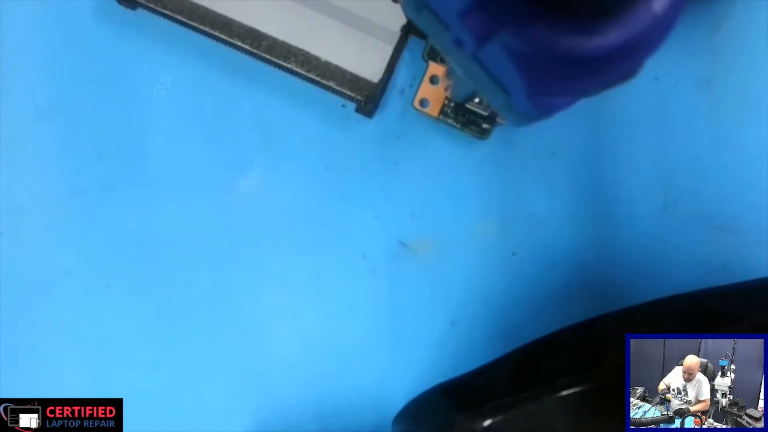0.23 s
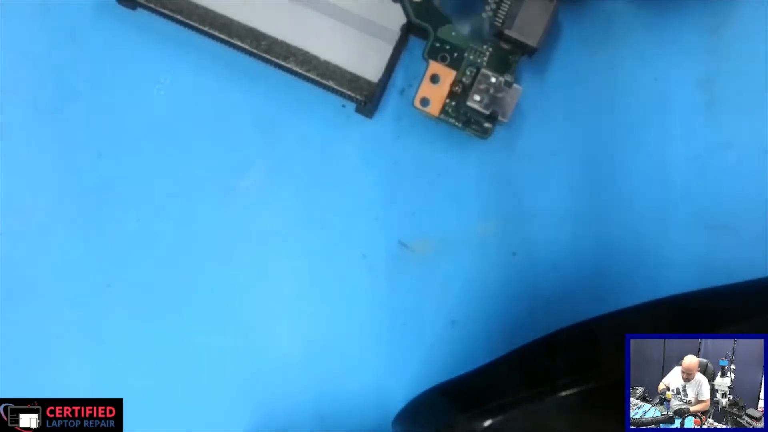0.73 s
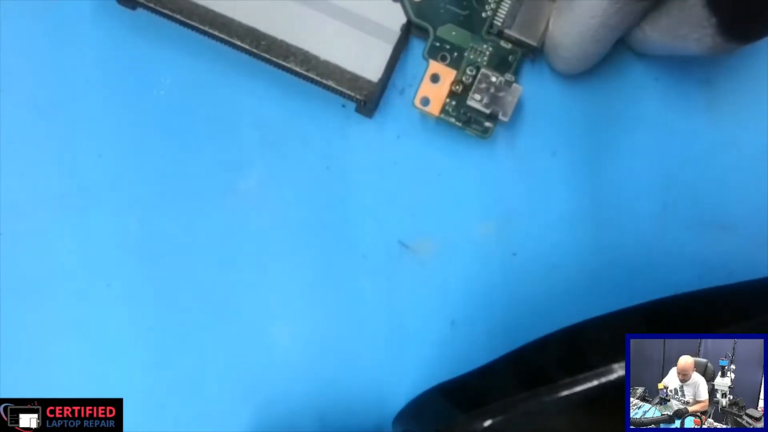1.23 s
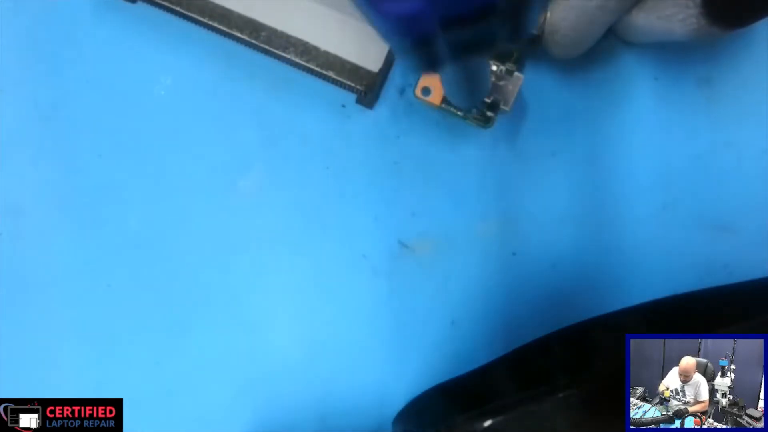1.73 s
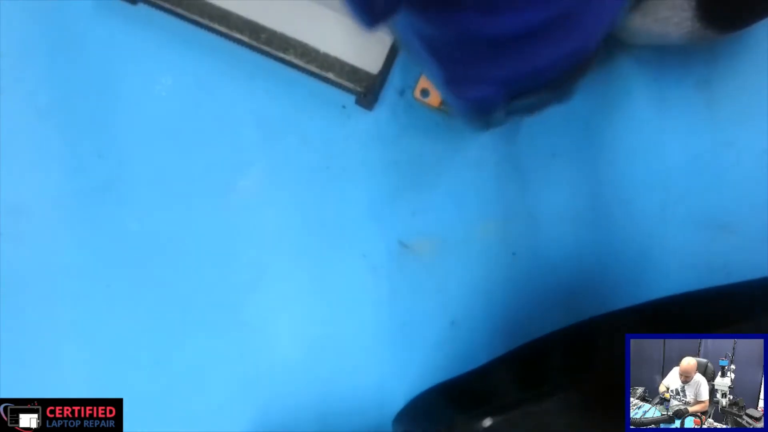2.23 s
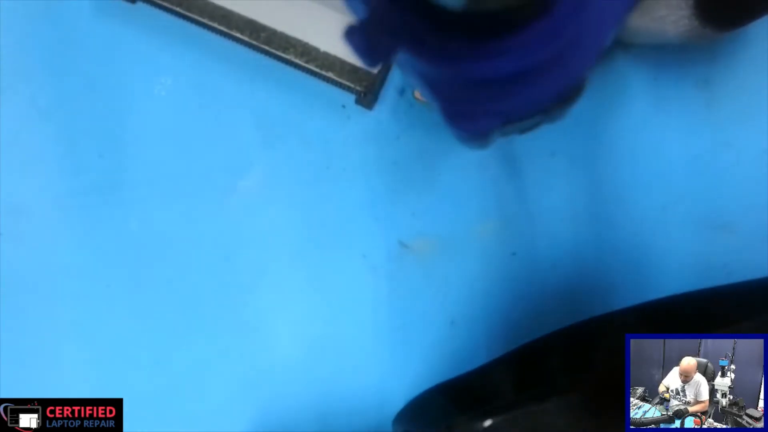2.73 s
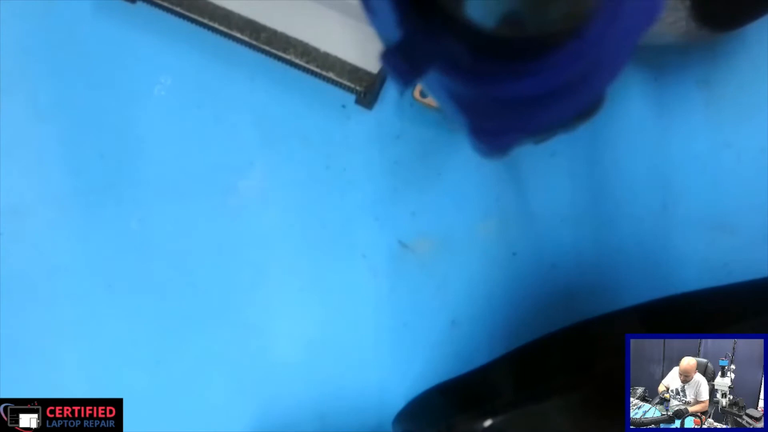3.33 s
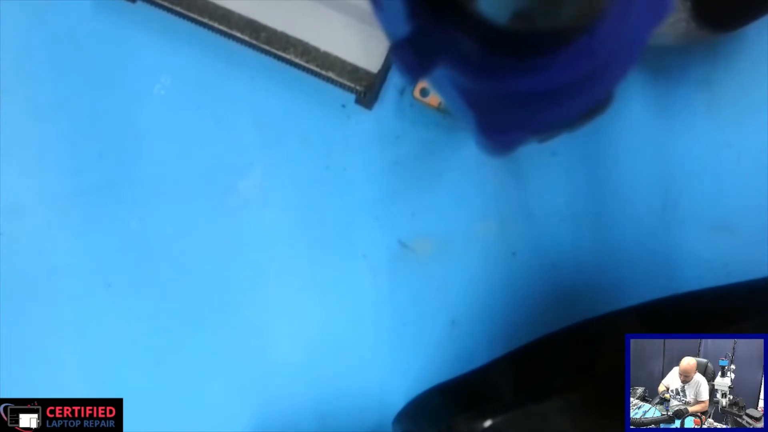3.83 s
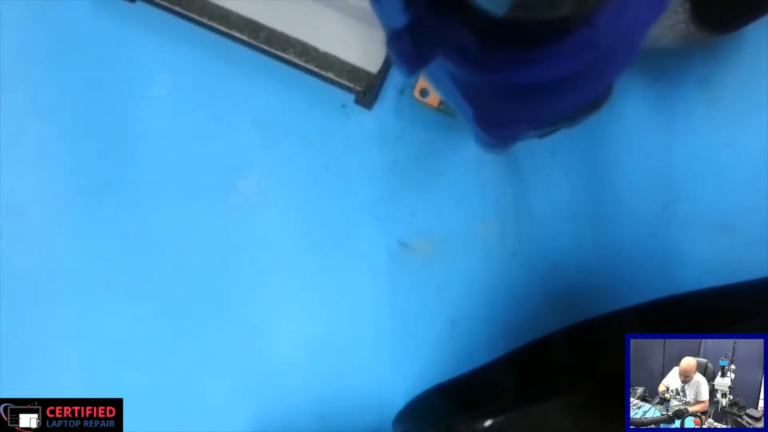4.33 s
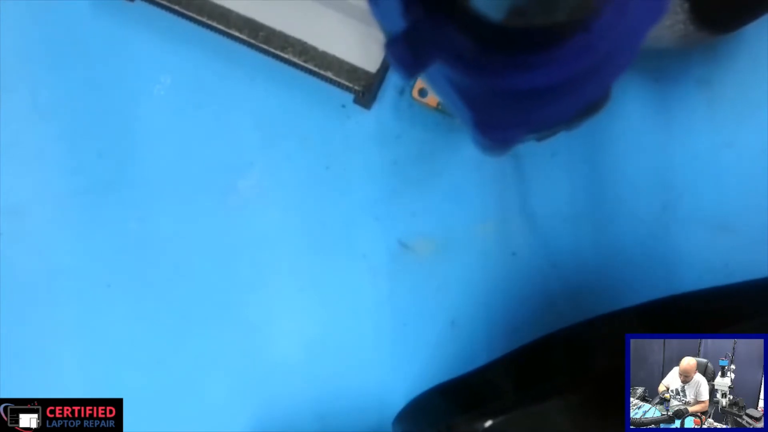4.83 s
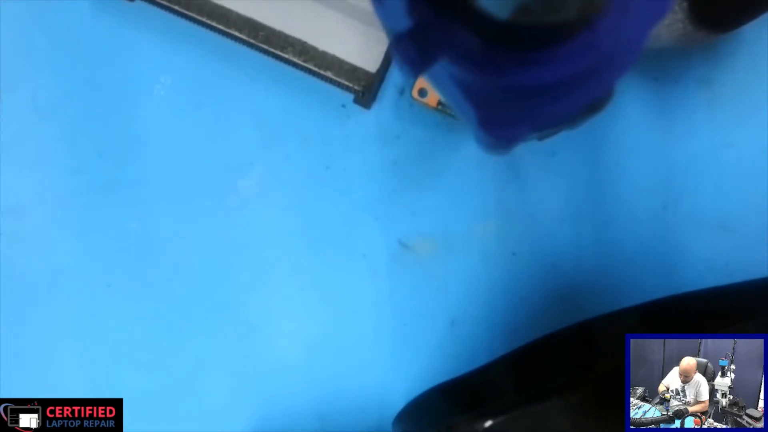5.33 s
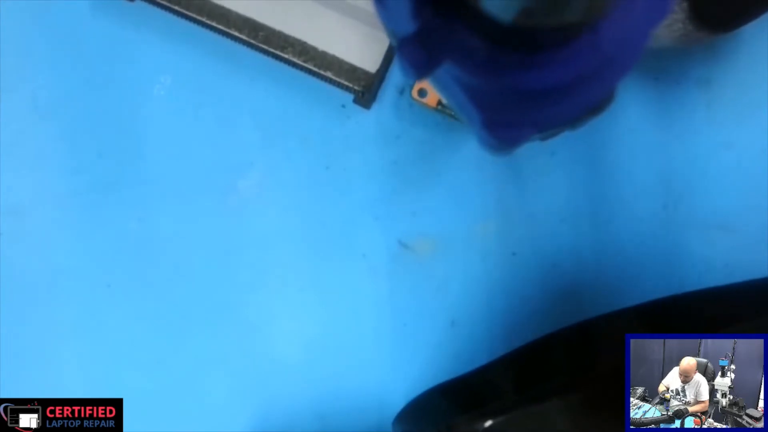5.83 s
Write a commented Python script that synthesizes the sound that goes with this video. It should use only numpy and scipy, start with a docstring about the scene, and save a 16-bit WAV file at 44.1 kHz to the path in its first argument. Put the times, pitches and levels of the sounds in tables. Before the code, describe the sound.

A small electric vacuum pump rasps to a stop, faint ticks and scrapes follow over fan noise, then a trigger click and another short buzz.

```python
"""Desoldering gun at a repair bench

The gun's diaphragm vacuum pump runs twice, buzzing at about 60 strokes a second: a drone locked to the crank,
valve slaps ringing the casing, and puffs of air. In between, the nozzle ticks and scrapes on solder joints
and nudges the board: short damped rings, noise bursts and low thuds, over noise-band fans and a sine hum.
The close microphone has a narrow band and overloads on the pump strokes, which makes the buzz rasp.
"""
import sys
import numpy as np
from scipy import signal
from scipy.fft import rfft, irfft, next_fast_len
from scipy.io import wavfile
from scipy.ndimage import map_coordinates

SR = 44100
rng = np.random.default_rng(int(sys.argv[2]) if len(sys.argv) > 2 else 0)


def file_out(sig):
    """Save sig as 16-bit WAV at sys.argv[1]."""
    # one column per channel
    cols = np.atleast_2d(sig).T
    # limit, then scale
    lim = np.clip(cols, -1, 1)
    pcm = np.round(lim * 32767).astype(np.int16)
    wavfile.write(sys.argv[1], SR, pcm)


N = 268083  # length in samples

# PUMP
# Pulls of the trigger [on t/s, off t/s, stroke rate the unloaded motor heads for f/Hz]
TRIGGER_PULLS = [(-.5227, .411, 73.49), (5.2405, 5.81, 72.57)]
# Diaphragm drone in each run [multiple of the full stroke rate, relative level/dB]
DRONE_FIRST = [(1, -2.5), (2, 3.5), (3, -3), (4, 3), (5, 4), (6, -15), (7, 0), (8, 5), (9, -2.5),
               (10, -0.5), (11, 2), (12, 1), (13, 1.5), (14, 4.5), (15, 4.5), (16, -16), (17, 0), (18, -2),
               (19, -18), (20, -5.5)]
DRONE_SECOND = [(1, 0.5), (2, -1), (3, -4.5), (4, 1), (5, 0.5), (6, -10), (7, -2), (8, -2), (9, -6),
                (10, 2), (11, -2.5), (12, -21), (13, -15.5), (14, 0.5), (15, -2), (16, -49), (17, -35),
                (18, -2.5), (19, -8), (20, -6.5)]
# Casing resonances rung by the valves in each run [f/Hz, width/Hz, relative level/dB]
CASE_FIRST = [(917, 80, 2.5), (1207, 190, -4), (1528, 113, 4.5), (1918, 92, 2), (2080, 240, -7),
              (2330, 150, -7), (3615, 130, -13), (4670, 120, -22)]
CASE_SECOND = [(970, 113, 3), (1170, 200, -3), (1480, 110, 3.5), (1710, 40, 2.5), (1892, 80, 5),
               (2096, 43, 3.5), (2290, 127, 2), (3470, 96, -7.5), (5100, 3000, -14.5)]
# Valve slaps within one stroke [t/s from the stroke's peak, relative level/dB]
VALVE_SLAPS = [(-.0038, 1.5), (-.0014, 11.5), (.0008, 0.5)]
# Colour of the air puff [f/Hz, relative level/dB]
AIR_COLOUR = [(60, -1), (300, 1.5), (1000, 2), (2200, 0.5), (3000, -4), (4700, -4), (6000, -6.5),
              (7800, -10.5), (10000, -0.5), (15000, -19)]

# FANS
# Colours of the four noise bands [f/Hz, relative level/dB]
RUMBLE_COLOUR = [(20, -1.5), (45, -6), (85, -8), (160, -3), (220, 6), (270, -0.5), (335, 9), (410, -2.5),
                 (550, -2), (690, 4), (800, -13), (1100, -45), (8000, -92)]
RUSH_COLOUR = [(600, -8), (900, -1), (1150, 3.5), (1350, -2), (1550, -1.5), (1850, -11), (2050, -17),
               (2450, -5.5), (2750, -28), (9000, -56)]
WHIR_COLOUR = [(1500, -23), (2000, 4.5), (2750, -8), (3100, -0.5), (3400, -3.5), (4000, -1.5), (5000, -6.5),
               (8000, -29), (9000, -71)]
HISS_COLOUR = [(3500, -35), (4600, 1), (5500, -4.5), (6300, -8), (6900, -26), (8000, -27.5), (9000, -69)]
# Mains and fan tones [f/Hz, level/dB]
HUM_TONES = [(60, -70.5), (119, -69.5), (310, -69), (1491, -74.5), (1739, -80), (1992, -80), (3047, -81.5)]
# How near the gun is to the board, where it throws the fans' noise back at the microphone [t/s, nearness 0-1]
NEARNESS = [(1.35, 0), (1.75, 0.88), (2.9, 0.85), (3.65, 0.73), (4.3, 0.7)]

# HANDLING
# Clacks that end each run's last, slow stroke [t/s, level/dB]
CLACKS = [(.3985, -17.5), (5.7975, -18)]
# Nozzle landing on a pin [t/s, level/dB]
LANDINGS = [(2.862, -27.5), (3.4711, -31)]
# Pin chattering in its hole [t/s, level/dB]
CHATTER = [(2.8843, -21.5), (2.899, -11.5), (2.9686, -34), (3.4947, -30), (3.5103, -27)]
# Trigger clicks [t/s, level/dB]
CLICKS = [(4.9115, -14.5), (4.9395, -12.5)]
# Trigger spring pinging when pulled and when the first strokes shake it [t/s, level/dB]
PINGS = [(5.2245, -30.5), (5.2514, -14), (5.2744, -15.5)]
# Colour of a contact's crack, gathered around its ring [multiple of the ring pitch, relative level/dB]
CRACK_COLOUR = [(.12, -40), (.35, -24), (.63, -12), (1, -1), (1.45, -19), (1.9, -33)]
# Nozzle scraping on solder; the first row is a faint, broad tick [t/s, level/dB, length/s]
SCRAPES = [(0.524, -53, 0.0061), (0.82, -63.5, 0.051), (2.35, -62, .025), (3.449, -57, 0.014),
           (3.542, -47.5, 0.016), (3.82, -53, 0.015), (4.317, -65, 0.036), (4.394, -59.5, 0.013),
           (4.425, -56.5, 0.036), (5.067, -59, 0.065)]
# Colour of the scraping [f/Hz, relative level/dB]
SCRAPE_COLOUR = [(800, 1), (2000, -2), (3200, -0.5), (5000, 3.5), (7500, -0.5), (9000, -31)]
# Board pushed against the bench; a soft push mostly stirs the low modes [t/s, level/dB, reach f/Hz]
THUDS = [(2.865, -36.5, 200), (2.885, -43, 1500), (2.899, -39, 1600), (3.475, -36.5, 260),
         (3.567, -40, 584)]
# Ringing modes of board and bench [f/Hz, relative level/dB, t60/s]
BENCH_MODES = [(67.2, -9.5, 0.57), (117.4, -8, .45), (157, 4.5, 0.078), (206, -7, 0.25), (307, -8, 0.36),
               (858, 5.5, 0.04), (1240, 9.5, 0.025)]

# SPACE
# Stereo width of all noise [f/Hz, side against mid level/dB]
WIDTH = [(300, -88), (1500, -18.5), (3000, -14), (5000, -10), (8000, -2.5)]
# Decay of the workshop's tail [f/Hz, t60/s]
ROOM_DECAY = [(100, 0.44), (400, 0.49), (720, 0.4), (900, 0.52), (1300, 0.33), (2050, 0.66), (2800, 0.31),
              (5000, 0.52), (8000, 0.3), (10000, 0.098)]
# Colour of the workshop's tail [f/Hz, relative level/dB]
ROOM_COLOUR = [(100, 1.5), (400, 1), (750, 3), (900, 0.5), (1300, 4), (2050, -1), (3000, -1)]

# The motor kicks in at this stroke rate and gathers speed with this time constant
KICK_HZ, SPIN_UP_S = 39.57, .1151
# The vacuum builds after a delay; its load takes this much off the stroke rate
VACUUM_DELAY_S, VACUUM_BUILD_S, SAG_HZ = .0669, .2676, 11.04
# This long before it stops, the motor starts to lose a share of its speed within BRAKE_S
COAST_S, BRAKE_S, BRAKE_SHARE = .04, .015, .22
# While air still flows, each stroke hoots in the exhaust port and the valves slap harder
PORT_HZ, PORT_T60_S, PORT_DB, FLOW_DB = 918, 0.044, -11.5, 3
AIR_DB = -28.5
MIC_HZ, TOP_HZ = 8050, 15500  # band edges before and after the overload


def amp(db):
    """Decibels to gain."""
    return 10 ** (np.asarray(db) / 20)


def unit(x):
    """Level a sound to rms 1."""
    return x / np.sqrt(np.mean(x ** 2) + 1e-20)


def along(points, hz):
    """Read a curve of (Hz, value) points, joined on a log frequency axis."""
    f, value = np.transpose(points)
    return np.interp(np.log(hz + 1), np.log(f + 1), value)


def clock():
    """The time of every sample, in seconds."""
    return np.arange(N) / SR


def wobble(rate):
    """A smooth random curve with this many knots a second."""
    knots = rng.standard_normal(int(N * rate / SR) + 4)
    return map_coordinates(knots, [clock() * rate])


def filtered(x, response):
    """Shape x with a complex response of frequency."""
    size = next_fast_len(N + SR // 2)
    hz = np.fft.rfftfreq(size, 1 / SR)
    return irfft(rfft(x, size) * response(hz), size)[..., :N]


def low_pass(x, edge_hz, leak=0):
    """A very steep cut above the edge, down to a remaining leak."""
    return filtered(x, lambda hz: leak + (1 - leak) / np.sqrt(1 + (hz / edge_hz) ** 120))


def noise(colour):
    """Coloured stereo noise of rms 1, centred in the bass and wider in the treble."""
    def mid_side_gain(hz):
        mid_db = along(colour, hz)
        return amp([mid_db, mid_db + along(WIDTH, hz)])

    mid, side = filtered(rng.standard_normal((2, N)), mid_side_gain)
    return unit(np.array([mid + side, mid - side]))


def add(track, s, sound):
    """Mix a short sound in at time s, trimmed at the end of the track."""
    part = track[..., round(s * SR):][..., :sound.shape[-1]]
    part += sound[..., :part.shape[-1]]


def pump():
    """Two pulls of the trigger, with the gun held differently for each."""
    first = pump_run(TRIGGER_PULLS[0], DRONE_FIRST, CASE_FIRST, drone_db=-23.5, valve_db=-26.5)
    second = pump_run(TRIGGER_PULLS[1], DRONE_SECOND, CASE_SECOND, drone_db=-21.5, valve_db=-27.5)
    return first + second


def pump_run(run, orders, case, drone_db, valve_db, stiffness=3.1, choke=2):
    """Each crank turn gives one push of the diaphragm, a clatter of valves and a puff of air."""
    on_s, off_s, free_hz = run
    on = np.arange(round(on_s * SR), round(off_s * SR))
    rate = motor_speed(on / SR, on_s, off_s, free_hz)
    turn = np.cumsum(rate) / SR - .55  # crank position in turns

    # a run may already be under way at time 0
    heard = on >= 0
    on, rate, turn = on[heard], rate[heard], turn[heard]
    t = on / SR
    strokes = np.interp(np.arange(np.ceil(turn[0]), turn[-1]), turn, t)  # time of each whole turn
    speed = rate / rate.max()
    running = np.clip(np.minimum(t - on_s, off_s - t) / 0.0057, 0, 1)  # short fades in and out
    push = speed ** stiffness  # a slow crank pushes more gently
    flow = (1 - vacuum(clock() - on_s)) ** choke  # the growing vacuum chokes the air flow

    clatter = valves(strokes, case)
    clatter = amp(valve_db + FLOW_DB * flow) * clatter / np.std(clatter[on])
    hoots = port(strokes, np.interp(strokes, t, flow[on] * speed))
    drone = amp(drone_db) * push * diaphragm(turn, rate / np.median(rate), orders)
    puffs = amp(AIR_DB) * air(turn) * noise(AIR_COLOUR)[:, on]

    out = np.tile(clatter + hoots, (2, 1))
    out[:, on] += running * (drone + puffs)
    return out


def motor_speed(t, on_s, off_s, free_hz):
    """Strokes per second: the motor spins up, is loaded by the growing vacuum, and brakes at the end."""
    spin = free_hz - (free_hz - KICK_HZ) * np.exp(-(t - on_s) / SPIN_UP_S)
    brake = np.clip((t - off_s + COAST_S) / BRAKE_S, 0, 1)
    return (spin - SAG_HZ * vacuum(t - on_s)) * (1 - BRAKE_SHARE * brake)


def vacuum(age):
    """How far the vacuum has built (0-1), age seconds after the trigger is pulled."""
    return np.clip((age - VACUUM_DELAY_S) / VACUUM_BUILD_S, 0, 1)


def diaphragm(turn, pace, orders, lead=0.2057, sweep=0.0069, scatter=0.87):
    """A drone locked to the crank; pressure builds through the stroke, so low orders arrive before high ones."""
    drone = np.zeros(len(turn))
    multiples, levels_db = np.transpose(orders)
    for k in range(1, len(orders) + 1):
        # the body's peaks stay put while the orders glide through
        db = np.interp(k * pace, multiples, levels_db)
        phase = k * (turn + lead) - sweep * k * k / 2  # in turns
        drone += amp(db) * np.cos(2 * np.pi * phase + scatter * rng.standard_normal())
    return unit(drone)


def valves(strokes, case, jitter_s=.000005, uneven_db=1.5):
    """The valve flaps slap a few times a stroke and ring the casing's resonances."""
    slaps = np.zeros(N)
    for delay, db in VALVE_SLAPS:
        chance = rng.standard_normal((len(strokes), 2))
        at = np.round((strokes + delay + jitter_s * chance[:, 0]) * SR).astype(int)
        gain = amp(db + uneven_db * chance[:, 1])
        slaps += np.bincount(at[at >= 0], gain[at >= 0], N)

    def casing(hz):
        total = 0
        for k, (centre, width, db) in enumerate(case):
            band = 1j * hz * width
            total = total + (-1) ** k * amp(db) * band / (centre * centre - hz * hz + band)  # signs alternate
        return total

    return filtered(slaps, casing)


def port(strokes, flow, attack_s=0.0018):
    """Each stroke that still moves air rings the exhaust port as a short, damped hoot."""
    out, t = np.zeros(N), np.arange(SR // 10) / SR
    envelope = amp(PORT_DB - 60 * t / PORT_T60_S) * (1 - np.exp(-t / attack_s))
    hoot = envelope * np.sin(2 * np.pi * PORT_HZ * t)
    for s, share in zip(strokes, flow):
        add(out, s, share * hoot)
    return out


def air(turn, centre=0.024, length=0.18, leak_db=-12):
    """Strength of the air puff that leaves with each stroke over a steady leak; centre and length in turns."""
    offset = (turn - centre + .5) % 1 - .5
    return unit(amp(leak_db) + np.exp(-(offset / length) ** 2))


def fans(drift=0.39):
    """Steady fans in four noise bands, with a hum of sines whose phase drifts slightly (radians)."""
    rumble = fan_layer(RUMBLE_COLOUR, level_db=-55.0, near_db=0.0, waver_db=1.0)
    rush = fan_layer(RUSH_COLOUR, level_db=-64, near_db=5.0, waver_db=3.5)
    whir = fan_layer(WHIR_COLOUR, level_db=-64, near_db=-3.0, waver_db=2.8)
    hiss = fan_layer(HISS_COLOUR, level_db=-74.5, near_db=7.0, waver_db=0.4)
    hum = np.zeros(N)
    for hz, db in HUM_TONES:
        hum += amp(db) * np.sqrt(2) * np.sin(2 * np.pi * hz * clock() + drift * wobble(3.77))
    return rumble + rush + whir + hiss + hum


def fan_layer(colour, level_db, near_db, waver_db):
    """One band of fan noise: it wavers, and shifts by near_db as the gun comes down to the board."""
    nearness = np.interp(clock(), *np.transpose(NEARNESS))
    level = level_db + near_db * nearness + waver_db * wobble(8.7)
    return amp(level) * noise(colour)


def ticks():
    """Crank, casing, nozzle, pin, trigger and spring each ring at their own pitch when struck."""
    crank = contacts(CLACKS, ring_hz=1843, t60=0.031, crack_db=-38, attack=.0006)
    # the casing rings on after the last stroke
    casing = amp(-23) * contacts(CLACKS, ring_hz=880, t60=0.34, crack_db=-30, attack=.003)
    nozzle = contacts(LANDINGS, ring_hz=4660, t60=0.014, crack_db=-3, attack=0.0007)
    pin = contacts(CHATTER, ring_hz=4020, t60=0.0066, crack_db=-36, attack=0.00031)
    trigger = contacts(CLICKS, ring_hz=5860, t60=0.0058, crack_db=-14, attack=0.00032)
    spring = contacts(PINGS, ring_hz=5980, t60=.02, crack_db=-12, attack=.0004)
    return crank + casing + nozzle + pin + trigger + spring


def contacts(rows, ring_hz, t60, crack_db, attack, after_db=-26, after_t60=0.027):
    """Each contact is a noisy crack and a short damped ring, with a faint rattle after it; times in s."""
    out, t = np.zeros((2, N)), np.arange(SR // 4) / SR
    grit = noise([(ring_hz * multiple, db) for multiple, db in CRACK_COLOUR])
    fade = amp(-60 * t / t60) * (1 - np.exp(-t / attack))
    ring = fade * np.sin(2 * np.pi * ring_hz * t)
    rattle = amp(after_db - 60 * t / after_t60)
    for s, db in rows:
        crack = grit[:, round(s * SR):][:, :len(t)] * (amp(crack_db) * fade + rattle)
        add(out, s, amp(db) * (ring + crack))
    return out


def scrapes(grain_db=3):
    """Short slides of the nozzle, and one faint tick: noise made gritty by fast random level changes."""
    t, strength = clock(), np.zeros(N)
    for s, db, length in SCRAPES:
        age = np.maximum(t - s, 0) / length
        strength += amp(db) * np.minimum(age * 10, 1) * np.exp(-age * age)
    grain = amp(grain_db * wobble(400))
    return strength * grain * noise(SCRAPE_COLOUR)


def thuds(attack_s=0.0023):
    """Board and bench answer a push with soft, damped notes, weaker above the push's reach."""
    out, t = np.zeros(N), np.arange(SR // 2) / SR
    for s, db, reach_hz in THUDS:
        ring = np.zeros(len(t))
        for hz, level, t60 in BENCH_MODES:
            mode = amp(level - 60 * t / t60) * np.sin(2 * np.pi * hz * t)
            ring += mode / np.hypot(1, (hz / reach_hz) ** 2)
        add(out, s, amp(db) * (1 - np.exp(-t / attack_s)) * ring)
    return out


def room(x):
    """The workshop's tail: convolution with shaped noise in which each frequency dies at its own speed."""
    hz, t, grains = signal.stft(rng.standard_normal(SR * 2 // 3), SR, nperseg=256)
    decay_db = along(ROOM_COLOUR, hz)[:, None] - 60 * t / along(ROOM_DECAY, hz)[:, None]
    tail = signal.istft(grains * amp(decay_db), SR, nperseg=256)[1]
    tail = np.pad(tail / np.linalg.norm(tail), (SR // 200, 0))  # 5 ms pre-delay
    return signal.fftconvolve(x.mean(axis=0), tail)[:N]


def scene():
    """The gun is close and nearly dry, with a little workshop tail, over the fans."""
    motor = pump()
    background = fans()
    handling = ticks() + scrapes() + thuds()
    tail = room(amp(-17.5) * motor + amp(-23) * handling)
    return motor + handling + tail + background


def record(dry, ceiling_db=-18.5, hardness=6, leak_db=-17, merge_hz=1400):
    """The narrow-band microphone overloads, and the flattened peaks add treble; the bass is mono."""
    x = low_pass(dry, MIC_HZ, amp(leak_db))
    left, right = x / (1 + np.abs(x / amp(ceiling_db)) ** hardness) ** (1 / hardness)
    mid = (left + right) / 2
    side = filtered((left - right) / 2, lambda hz: hz ** 2 / (hz ** 2 + merge_hz ** 2))
    return low_pass(np.array([mid + side, mid - side]), TOP_HZ)


dry = scene()
out = record(dry)
file_out(out)
```